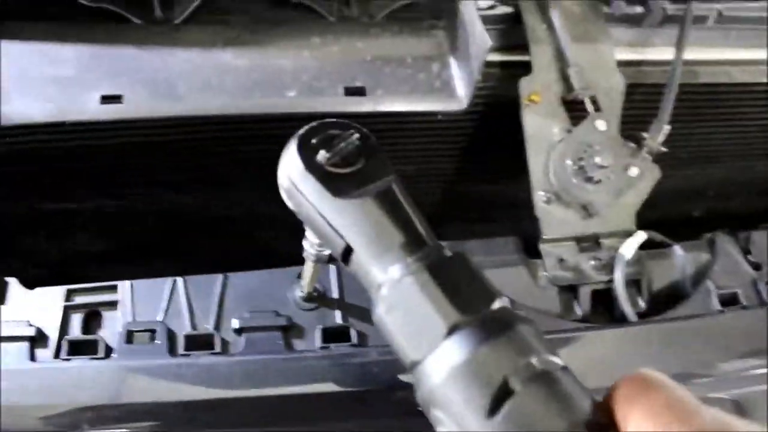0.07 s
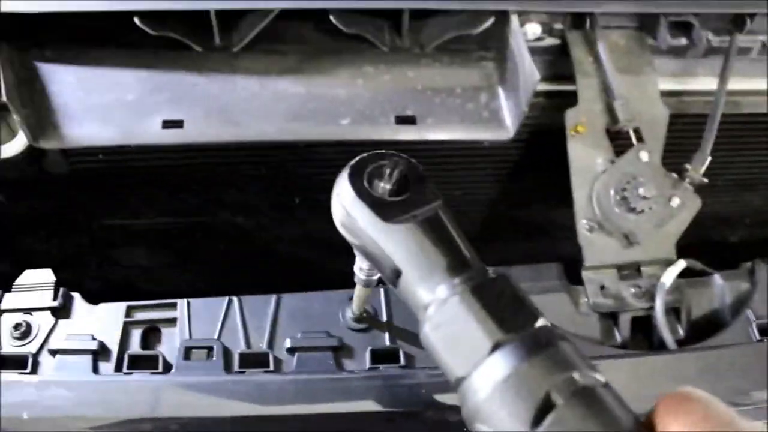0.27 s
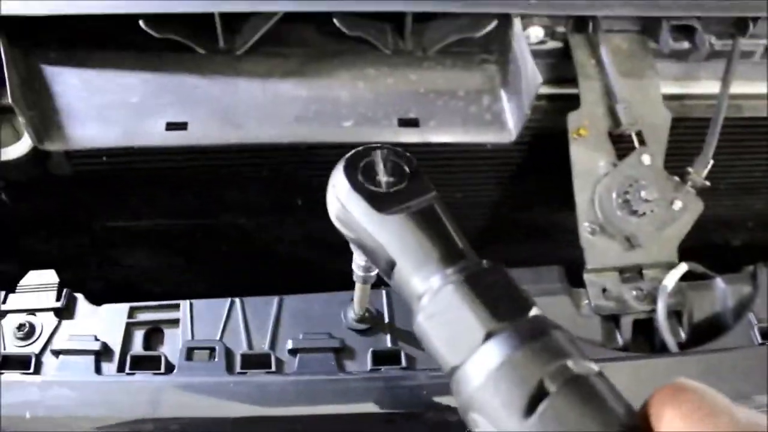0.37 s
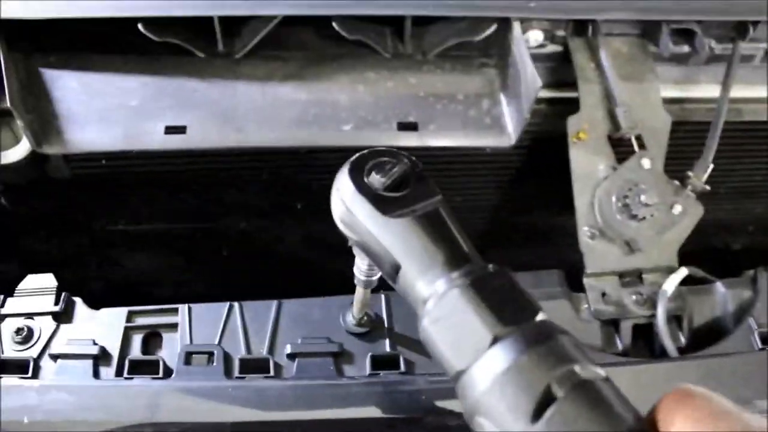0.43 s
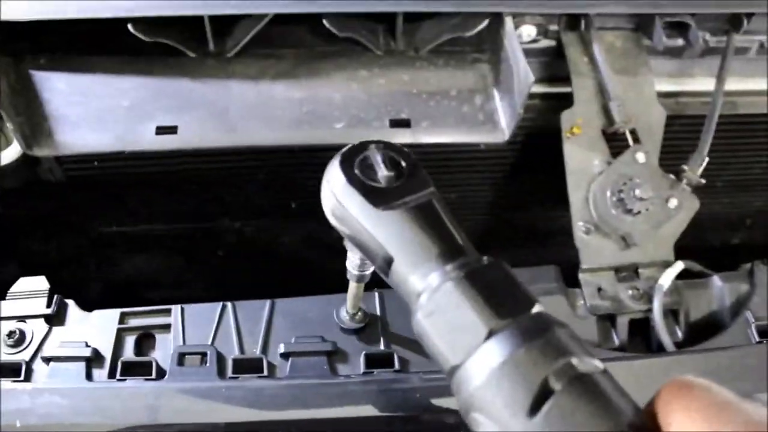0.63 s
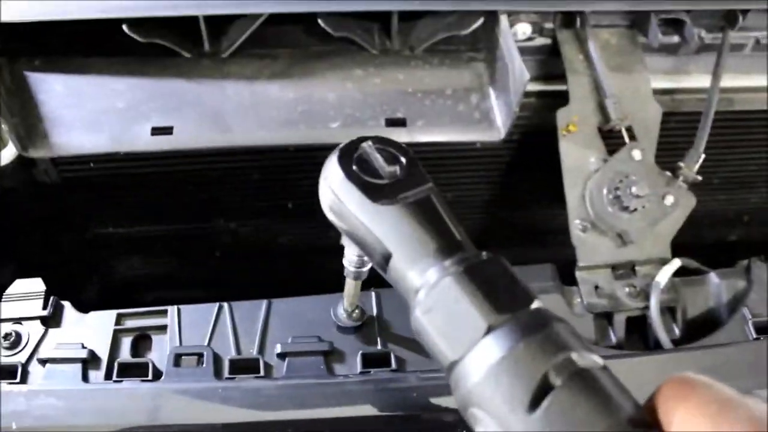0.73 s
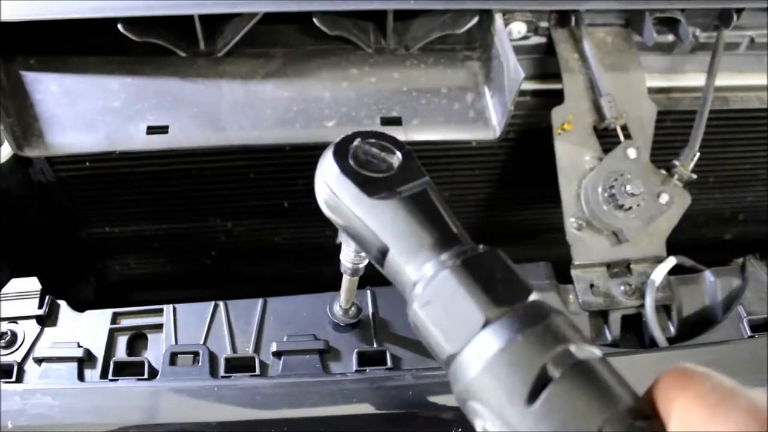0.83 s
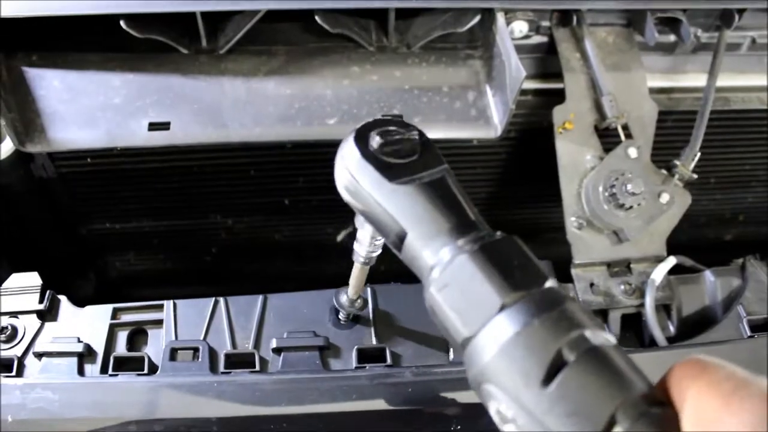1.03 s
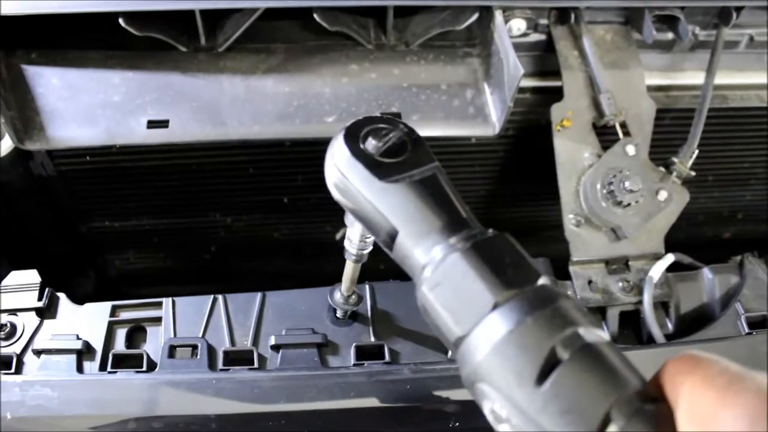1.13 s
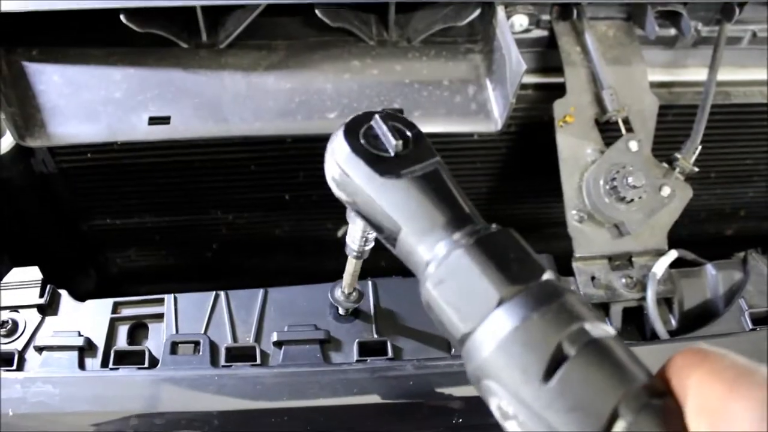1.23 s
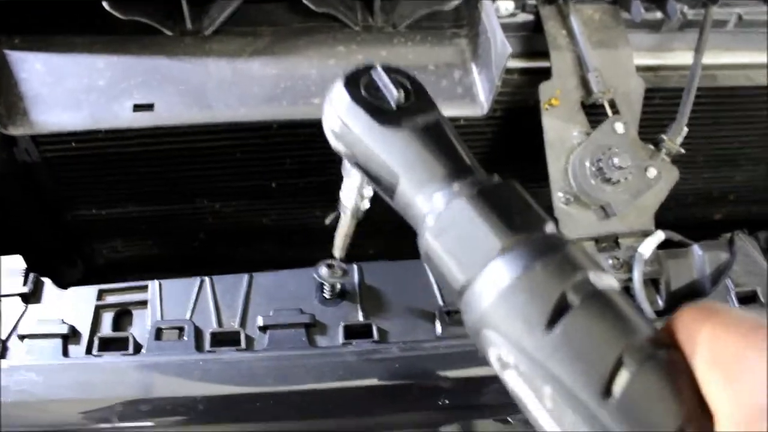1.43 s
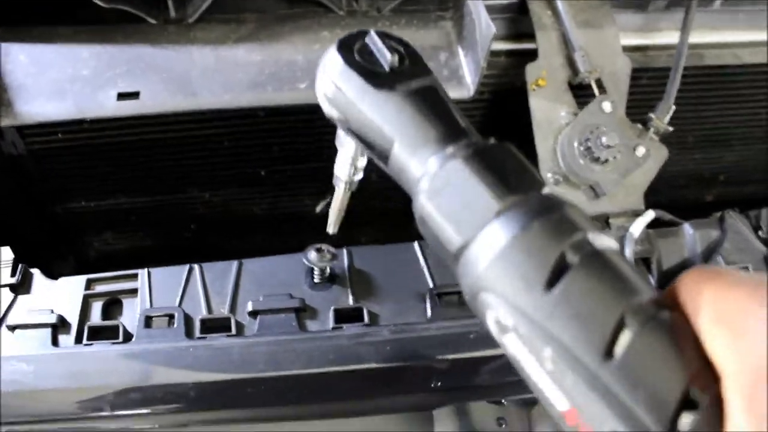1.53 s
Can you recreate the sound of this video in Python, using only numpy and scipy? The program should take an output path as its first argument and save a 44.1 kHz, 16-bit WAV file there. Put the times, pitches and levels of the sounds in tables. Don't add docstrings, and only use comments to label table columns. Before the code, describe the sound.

A cordless electric ratchet buzzes in one second-long burst, backing a screw out of plastic panel

```python
import sys
import numpy as np
from scipy import signal
from scipy.fft import rfft, irfft, next_fast_len
from scipy.io import wavfile
from scipy.ndimage import uniform_filter1d, map_coordinates

SR = 44100
rng = np.random.default_rng(int(sys.argv[2]) if len(sys.argv) > 2 else 0)


def convert_level_to_amplitude(level_db):
    exponent = np.asarray(level_db, float) / 20
    return 10 ** exponent


def digitize_waveform(pressure):
    field = np.atleast_2d(pressure).T
    bounded = np.clip(field, -1, 1)
    quanta = np.round(bounded * 32767).astype(np.int16)
    wavfile.write(sys.argv[1], SR, quanta)


N = 70560


def unit(x):
    return x / np.sqrt(np.mean(x ** 2) + 1e-20)


def along(points, hz):
    f, v = np.transpose(points)
    return np.interp(np.log(hz + 1), np.log(f + 1), v)


def curve(rows):
    return np.interp(np.arange(N) / SR, *np.transpose(rows))


def wobble(rate_hz):
    return map_coordinates(rng.standard_normal(400), [np.arange(N) * rate_hz / SR])


def coloured(x, gain):
    m = 2 * next_fast_len(N)
    cepstrum = irfft(np.log(gain(np.fft.rfftfreq(m, 1 / SR)) + 1e-6), m)
    cepstrum[1:m // 2] *= 2
    cepstrum[m // 2 + 1:] = 0
    return irfft(rfft(x, m) * np.exp(rfft(cepstrum)), m)[:N]


def shop():
    # f/Hz, density/dB per Hz
    spectrum = [(40, -13), (85, -0.5), (200, 1), (900, -11), (2100, -11), (4000, -14.5), (6500, -25.5),
                (16000, -37.5)]
    level_db, split_hz = -48.5, 400
    hiss_sway_db, rumble_sway_db = .5, 1.2
    hiss = coloured(rng.standard_normal(N), lambda f: convert_level_to_amplitude(along(spectrum, f)) * (f > split_hz))
    rumble = coloured(rng.standard_normal(N), lambda f: convert_level_to_amplitude(along(spectrum, f)) * (f <= split_hz))
    hiss = hiss * convert_level_to_amplitude(hiss_sway_db * wobble(33.1))
    rumble = rumble * convert_level_to_amplitude(rumble_sway_db * wobble(25.73))
    return convert_level_to_amplitude(level_db) * unit(hiss + rumble)


def taps():
    # t/s, peak level/dB, f/Hz, t60/s
    contacts = [(.003, -36, 1310, 0.039), (.003, -38.5, 1580, 0.045), (0.00844, -40, 408, 0.045),
                (0.11, -46, 470, 0.034), (0.0069, -40.5, 3940, 0.035), (0.063, -51, 168, 0.155),
                (.0032, -37, 6480, .016), (.0032, -40, 14000, .012), (.118, -59, 13000, .008),
                (.184, -60, 11000, .006), (.1915, -50, 9000, .008), (.1915, -51, 13500, .008),
                (.216, -16, 5300, .014), (.2165, -13, 13000, .009), (.2105, -38, 450, .05),
                (.211, -35, 1300, .04), (.218, -31, 420, .025), (.2185, -18, 3550, .02),
                (.2192, -18, 1150, .016), (.2235, -21, 1700, .018), (.221, -22, 2100, .02),
                (.229, -27, 900, .03), (.2265, -29, 660, .03), (.234, -25, 1500, .03),
                (.2205, -19, 2500, .03), (.223, -22, 1900, .025), (.2253, -10, 14500, .008),
                (.2305, -18, 12000, .01), (.2315, -16, 5700, .018), (.2325, -15, 4400, .016),
                (.227, -28, 500, .03), (.235, -26, 480, .03), (.243, -35, 420, .02),
                (.238, -13, 8000, .007), (.241, -20, 6000, .006), (.2535, -19, 6500, .008),
                (.2438, -12, 7500, .01), (1.2212, -6, 5500, .007), (1.2212, -11, 9000, .008),
                (1.2195, -18, 1680, .03), (1.2255, -23, 1350, .018), (1.2403, -13, 5000, .006),
                (1.2403, -21, 2700, .008), (1.532, -53, 12000, 0.007), (1.568, -44.5, 230, 0.11)]
    # f/Hz, gain/dB
    crack_colour = [(200, -30), (800, -16), (2500, -5), (5000, -1), (14000, -1)]
    crack_gain, crack_t60_ratio, crack_t60_max_s, full_crack_hz = .9, .8, .011, 5000
    rise_cycles, detune = .6, .051
    rings, cracks = np.zeros(N + SR), np.zeros(N + SR)
    t = np.arange(SR // 5) / SR
    for s, db, hz, t60 in contacts:
        start = round(s * SR)
        ring = sum(np.sin(2 * np.pi * hz * (1 + detune * k) * t) for k in rng.standard_normal(3)) / 2
        rise = 1 - np.exp(-t * hz / rise_cycles)
        rings[start:][:len(t)] += convert_level_to_amplitude(db - 60 * t / t60) * ring * rise
        crack_t60 = min(crack_t60_ratio * t60, crack_t60_max_s)
        crack = crack_gain * min(1, hz / full_crack_hz) * rng.standard_normal(len(t))
        cracks[start:][:len(t)] += convert_level_to_amplitude(db - 60 * t / crack_t60) * crack
    return rings[:N] + coloured(cracks[:N], lambda f: convert_level_to_amplitude(along(crack_colour, f)))


def room(x):
    # f/Hz, t60/s
    decay = [(300, 0.24), (3000, 0.2), (12000, 0.24)]
    new_tail_s, delay_samples = .1, 150
    out, step = np.zeros(N + 2 * SR), round(new_tail_s * SR)
    for a in range(0, N, step):
        hz, t, z = signal.stft(rng.standard_normal(SR // 2), SR, nperseg=256)
        fade = convert_level_to_amplitude(-60 * t / along(decay, hz)[:, None])
        tail = signal.istft(z * fade, SR, nperseg=256)[1]
        wet = signal.fftconvolve(x[a:a + step], tail / np.linalg.norm(tail))
        out[a + delay_samples:][:len(wet)] += wet
    return out[:N]


def knock_hits(turns):
    # place/turn, level/dB
    knocks = [
        (.065, 0),
        (.18, -9),
        (.385, -1.5),
        (.69, -11),
        (.835, -4.5),
    ]
    # t/s, level over the rattle/dB
    jolts = np.array([(0.2727, 5.5), (0.3157, 6.3), (0.3495, 6.8), (0.495, 6.7), (0.5343, 6.8),
                      (0.543, 7.0), (0.7021, 8.1), (0.7102, 6.1), (0.777, 6.1), (0.8383, 5.5),
                      (0.8688, 6.0), (0.8776, 7.1), (0.8943, 6.4), (0.9384, 6.9), (1.0054, 6.1),
                      (1.0192, 5.9), (1.0275, 6.5), (1.0526, 6.8), (1.0693, 5.9), (1.0884, 5.6),
                      (1.1057, 5.7), (1.1386, 5.9), (1.1697, 5.9)])
    scatter_db, jitter_turns, jolt_db = .8, .008, -7
    rattle_per_s, rattle_db, rattle_spread_db = 300, -15, 1.1
    count = np.arange(int(turns[-1]) - 1)
    luck = rng.standard_normal((len(count), len(knocks), 2))
    loose = rng.random((int(rattle_per_s * N / SR), 2))
    place, db = np.transpose(knocks)
    at = np.searchsorted(turns, count[:, None] + place + jitter_turns * luck[..., 0]).ravel()
    hits = np.bincount(at, convert_level_to_amplitude(db + scatter_db * luck[..., 1]).ravel(), N)[:N]
    loose_level = convert_level_to_amplitude(rattle_db - rattle_spread_db * np.log(loose[:, 1]))
    hits += np.bincount((loose[:, 0] * N).astype(int), loose_level, N)
    hits[np.round(jolts[:, 0] * SR).astype(int)] += convert_level_to_amplitude(jolts[:, 1] + jolt_db)
    return hits


def head_rattle(hits):
    # f/Hz, density/dB per Hz
    spectrum = [(35, -73.5), (60, -65), (233, -34.5), (398, -14), (593, -11.5), (636, -12.5), (1660, -7),
                (5590, -4.5), (16000, -6.5)]
    # f/Hz, width/Hz, level/dB
    resonances = [(1648, 37, 7.5), (2650, 880, 4.5), (3450, 310, 4), (4250, 500, 5), (5655, 1140, 7.5),
                  (6880, 920, 3.5), (13320, 6900, 5.5)]
    knock_t60_s, rise_s = .005, .00072
    bed_db, body_bed_db, blur_hz = -3, 2, 3200
    spits = signal.lfilter([1], [1, -convert_level_to_amplitude(-60 / (knock_t60_s * SR))], hits)
    spits = unit(uniform_filter1d(spits, max(1, round(rise_s * SR))))
    grit = rng.standard_normal(N)
    sharp = unit((spits + convert_level_to_amplitude(bed_db)) * grit)
    blurred = unit((spits + convert_level_to_amplitude(body_bed_db)) * grit)
    b, a = signal.butter(2, blur_hz, fs=SR)
    noise = sharp + signal.filtfilt(b, a, blurred - sharp)

    def steel(f):
        peaks = sum(db / (1 + (2 * (f - c) / w) ** 2) for c, w, db in resonances)
        return convert_level_to_amplitude(along(spectrum, f) + peaks)

    return unit(coloured(noise, steel))


def shaft_hum(turns):
    # multiple of the shaft rate, level against the rattle/dB, drift as the screw frees/dB per s
    tones = [(0.978, -45.5, 2), (1.991, -33, 0), (3.018, -34.5, -3), (3.94, -33, 1), (4.995, -29, 0),
             (5.666, -29.5, 0.5), (7.99, -27, -0.5), (9.97, -32, -4), (11.85, -29.5, -7.5), (13.97, -25, 6),
             (15.66, -49.5, 17.5), (67.6, -34, 11)]
    waver_db, waver_growth_db, waver_max_multiple = .4, .3, 14
    drift_zero_s, turn_jitter = .7, .0022
    t = np.arange(N) / SR
    hum = np.zeros(N)
    for k, db, drift in tones:
        waver = (waver_db + waver_growth_db * min(k, waver_max_multiple)) * np.tanh(wobble(12.46))
        level = convert_level_to_amplitude(db + drift * (t - drift_zero_s) + waver)
        hum += level * np.sin(2 * np.pi * k * (turns + turn_jitter * wobble(22.4)))
    return np.sqrt(2) * hum


def ratchet():
    # t/s, f/Hz
    speed = [
        (.21, 117),
        (.27, 118.3),
        (.37, 118.7),
        (.43, 119.4),
        (.65, 119.35),
        (.8, 119.7),
        (1.2, 119.75),
        (1.23, 116),
    ]
    # t/s, level/dB
    load = [(.2095, -33.5), (.2155, -26), (.217, -21), (.236, -25), (.26, -16.5), (.33, -14.5),
            (.385, -20.5), (.425, -12.5), (.5, -17), (.65, -14.5), (.74, -17.5), (.86, -16), (.96, -17),
            (1.05, -17), (1.2, -15.5), (1.224, -20.5), (1.232, -25.5), (1.27, -44)]
    start_s, stop_s = .2095, 1.3
    hum_lead_db, hum_top_db = 4, -16.5
    turns = np.cumsum(curve(speed)) / SR
    rattle = head_rattle(knock_hits(turns))
    hum = shaft_hum(turns)
    t = np.arange(N) / SR
    running = (t > start_s) * (t < stop_s)
    load_db, flutter_db = curve(load), .45 * wobble(30.9)
    hum_db = np.minimum(load_db + hum_lead_db, hum_top_db)
    return rattle * convert_level_to_amplitude(load_db + flutter_db) * running, hum * convert_level_to_amplitude(hum_db + flutter_db) * running


def scuff():
    # t/s, level/dB
    slide = [
        (1.3, -70),
        (1.45, -66),
        (1.54, -59),
        (1.6, -52),
    ]
    centre_hz, width_hz = 2220, 890
    rub = coloured(rng.standard_normal(N), lambda f: 1 / (1 + ((f - centre_hz) / width_hz) ** 4))
    return unit(rub) * convert_level_to_amplitude(curve(slide) + 2.5 * wobble(39.7))


def scene():
    wet_db, hum_wet = -9, .35
    rattle, hum = ratchet()
    tool = rattle + taps()
    echo = convert_level_to_amplitude(wet_db) * room(tool + hum_wet * hum)
    return (tool + hum + echo + shop() + scuff())[None]


def low_pass(x):
    return signal.sosfilt(signal.butter(12, 17070, fs=SR, output="sos"), x)


def record(dry):
    # t/s, gain/dB
    gain_control = [
        (0, 5.5),
        (.236, 1),
        (.27, -8.5),
        (.4, -10.5),
        (1.32, -12),
        (1.45, -5.5),
        (1.6, -2.5),
    ]
    # f/Hz, gain/dB
    response = [(30, -14), (70, -4), (200, 0), (15780, 0), (15900, -70)]
    heard = coloured(dry[0] * convert_level_to_amplitude(curve(gain_control)), lambda f: convert_level_to_amplitude(along(response, f)))
    return low_pass(heard[None])


dry = scene()
out = record(dry)
digitize_waveform(out)
```